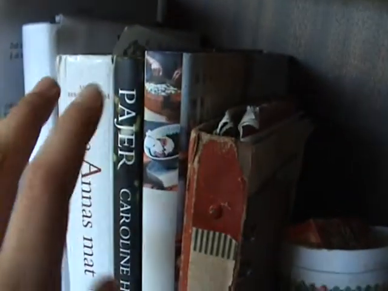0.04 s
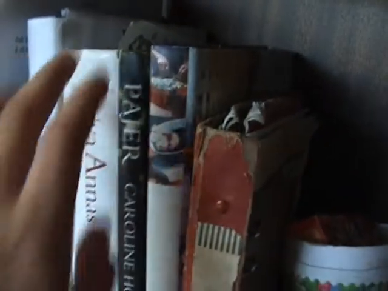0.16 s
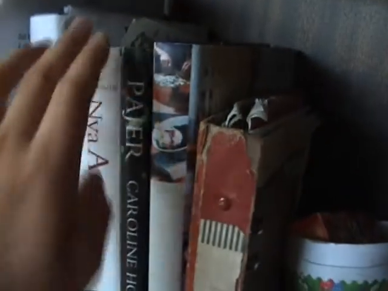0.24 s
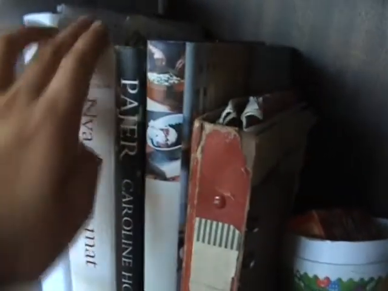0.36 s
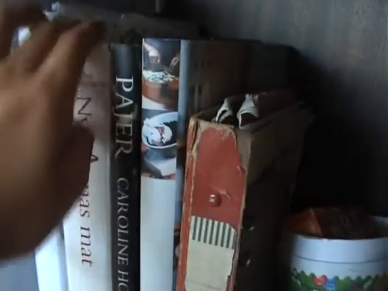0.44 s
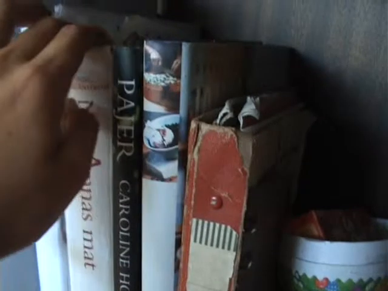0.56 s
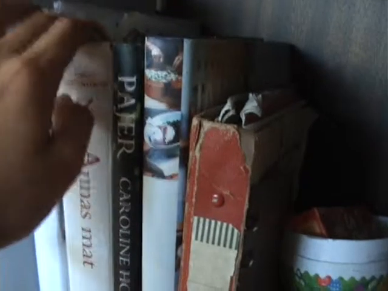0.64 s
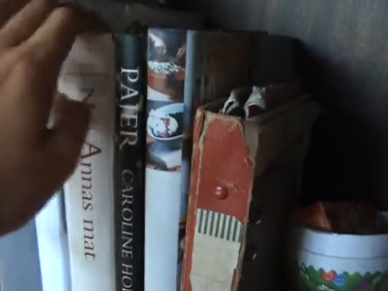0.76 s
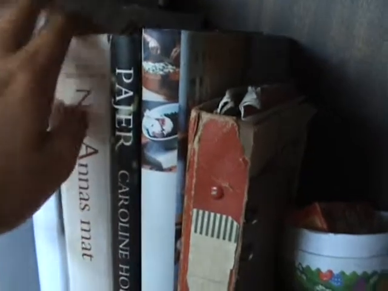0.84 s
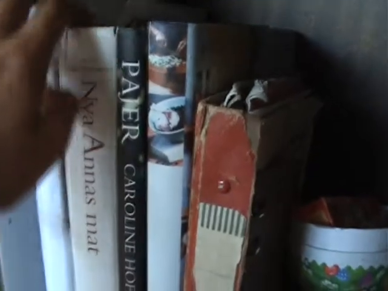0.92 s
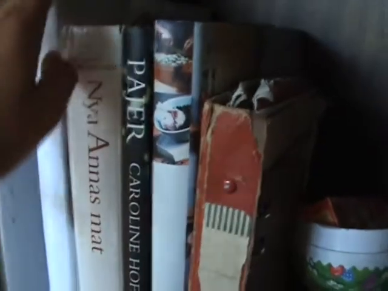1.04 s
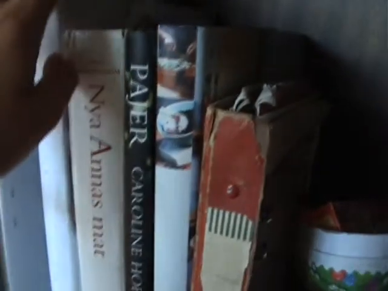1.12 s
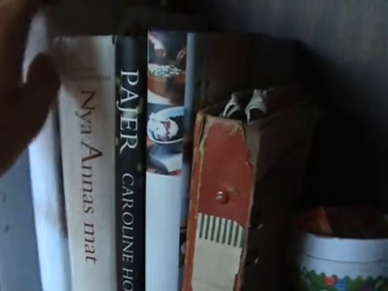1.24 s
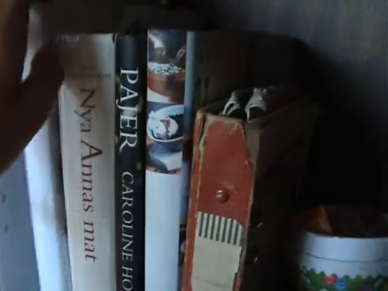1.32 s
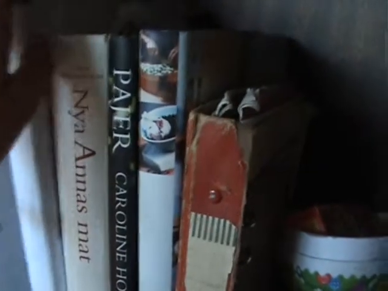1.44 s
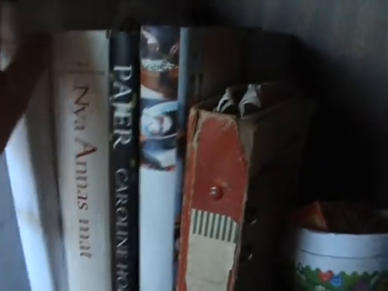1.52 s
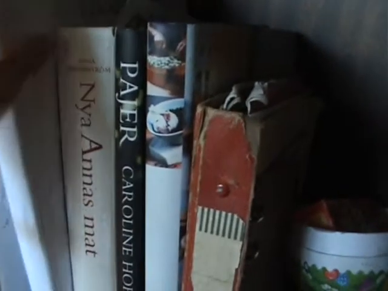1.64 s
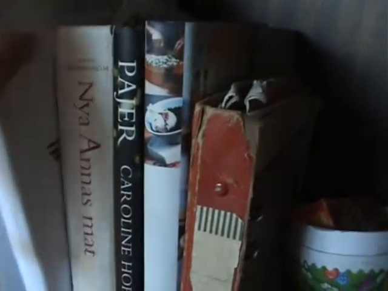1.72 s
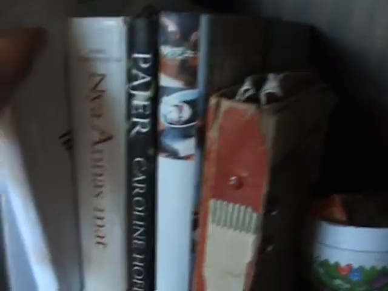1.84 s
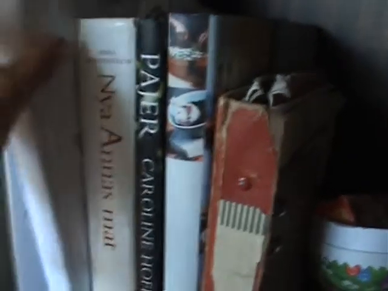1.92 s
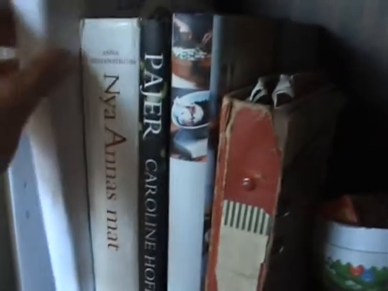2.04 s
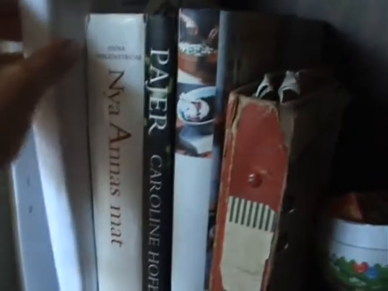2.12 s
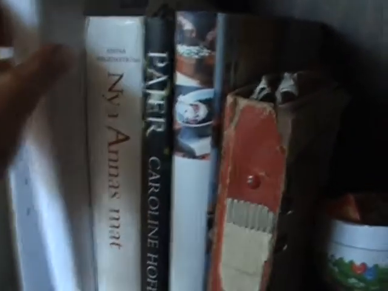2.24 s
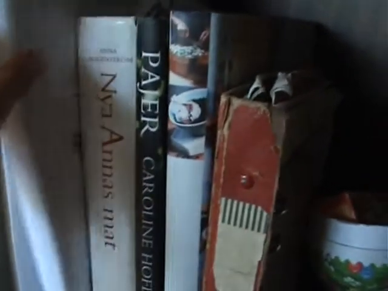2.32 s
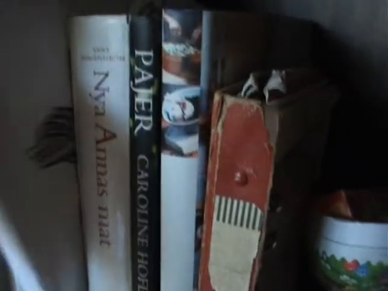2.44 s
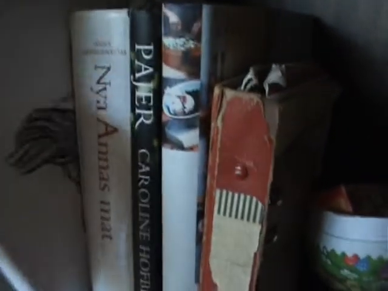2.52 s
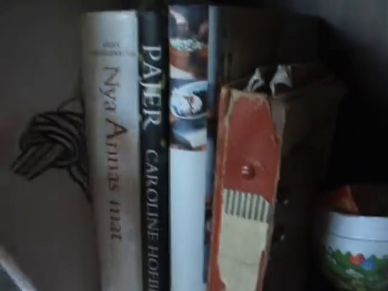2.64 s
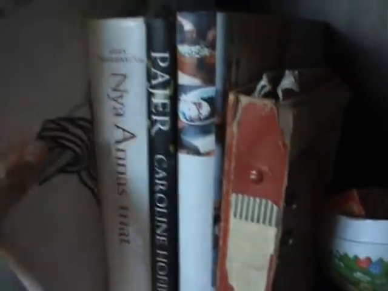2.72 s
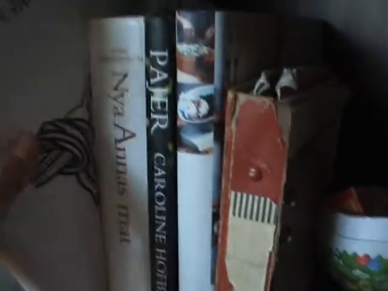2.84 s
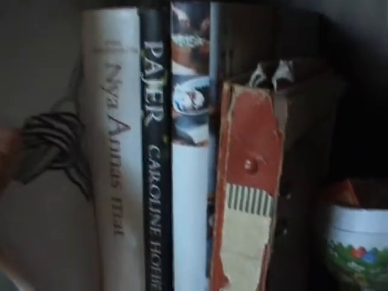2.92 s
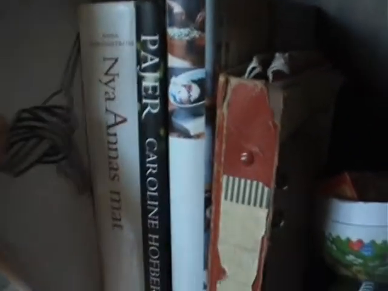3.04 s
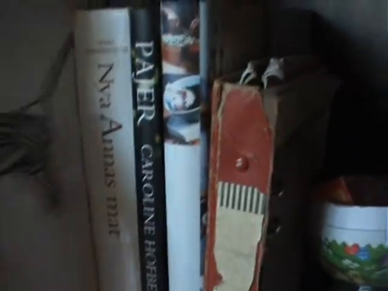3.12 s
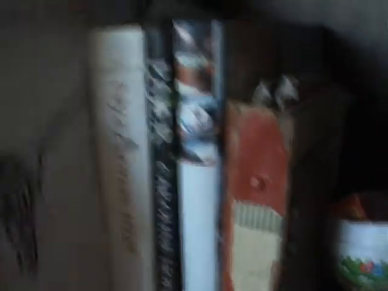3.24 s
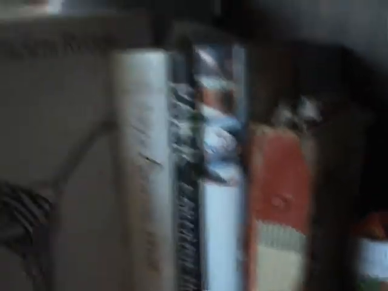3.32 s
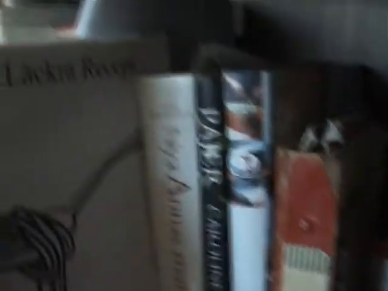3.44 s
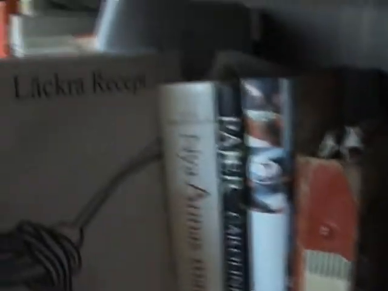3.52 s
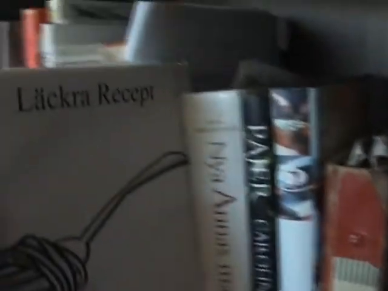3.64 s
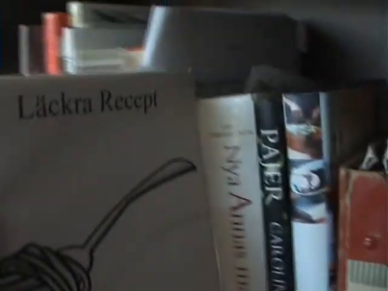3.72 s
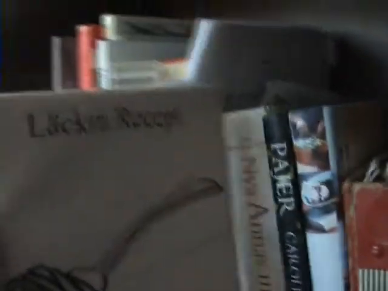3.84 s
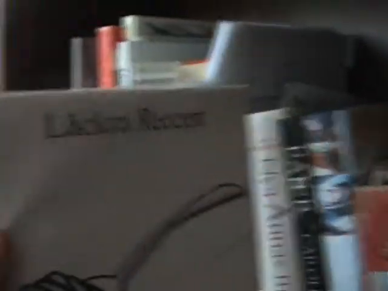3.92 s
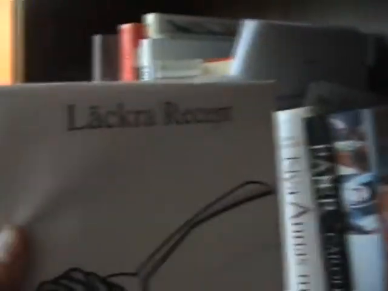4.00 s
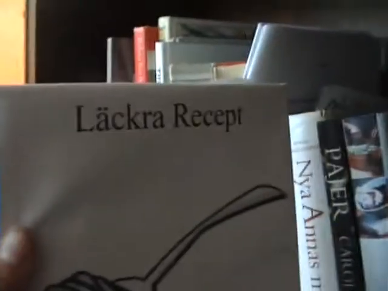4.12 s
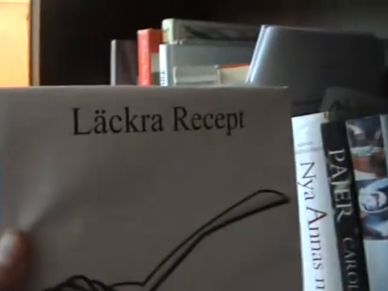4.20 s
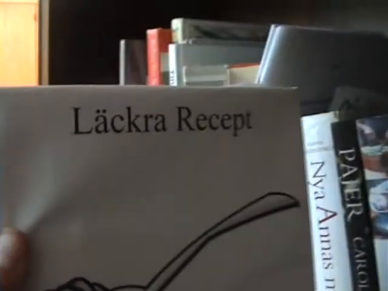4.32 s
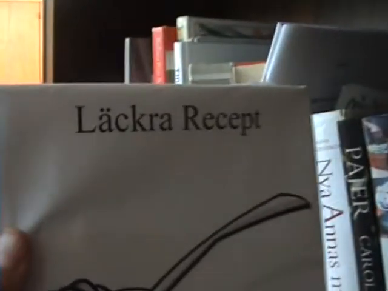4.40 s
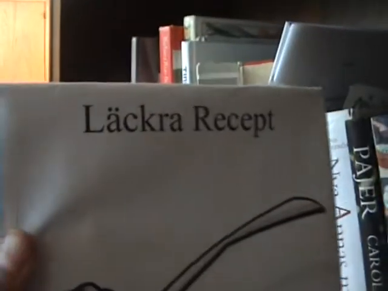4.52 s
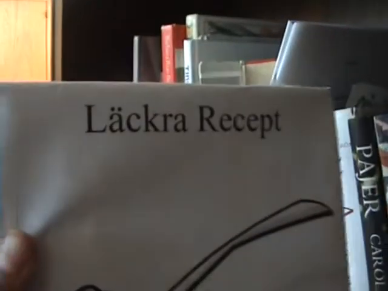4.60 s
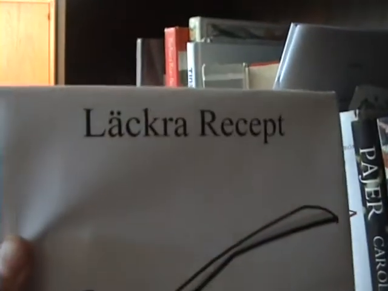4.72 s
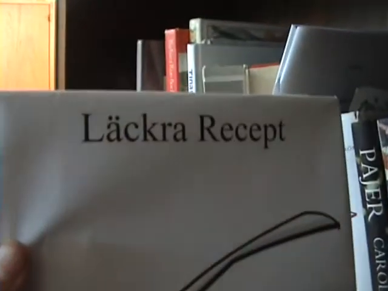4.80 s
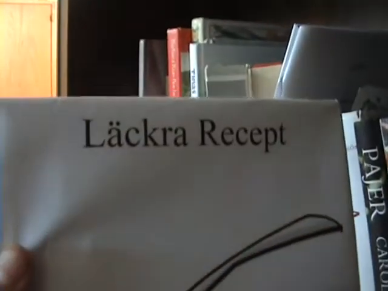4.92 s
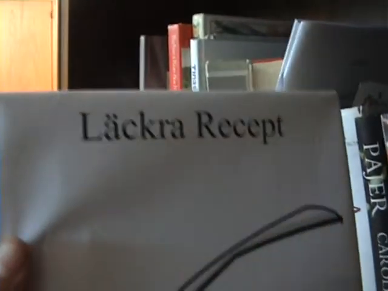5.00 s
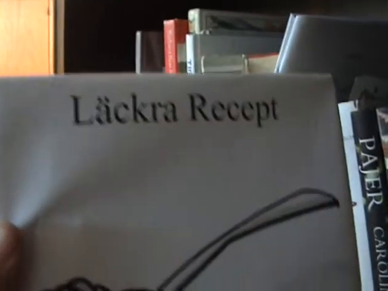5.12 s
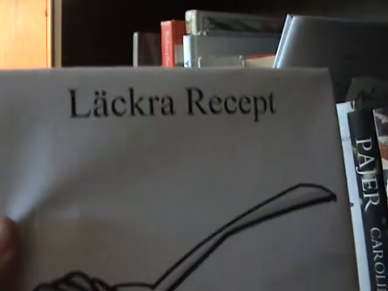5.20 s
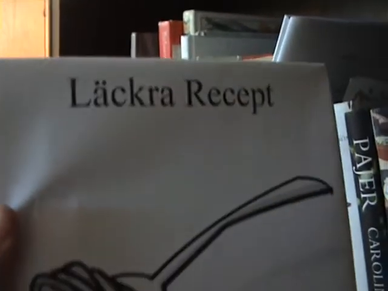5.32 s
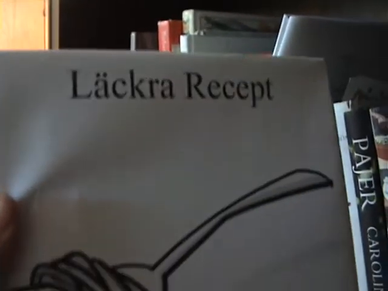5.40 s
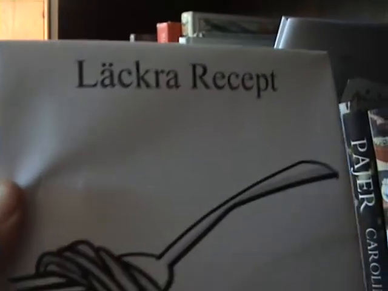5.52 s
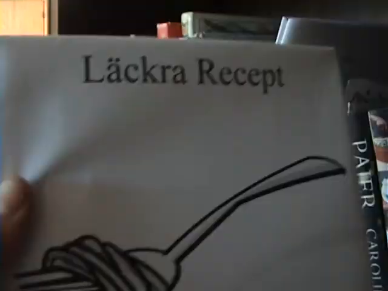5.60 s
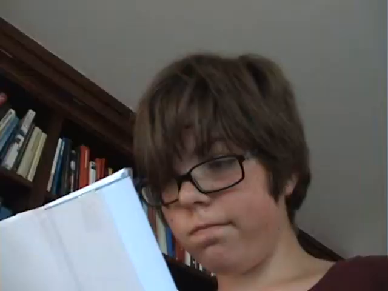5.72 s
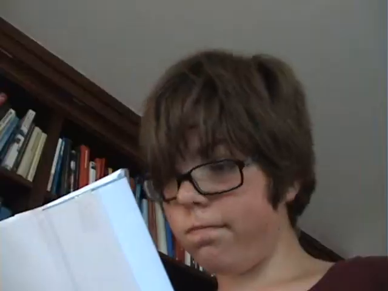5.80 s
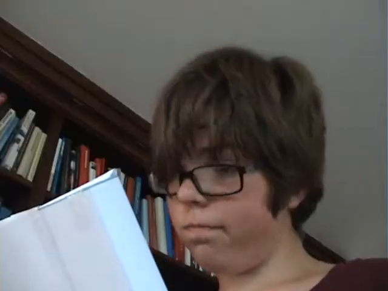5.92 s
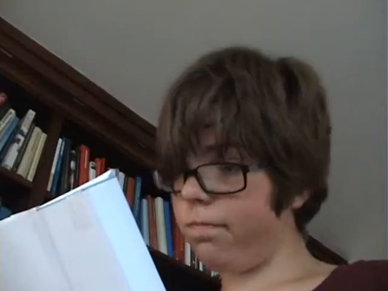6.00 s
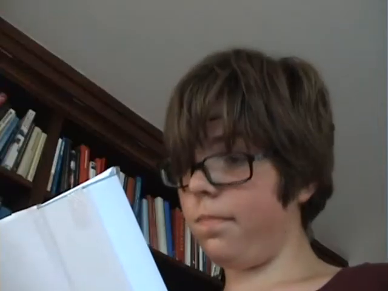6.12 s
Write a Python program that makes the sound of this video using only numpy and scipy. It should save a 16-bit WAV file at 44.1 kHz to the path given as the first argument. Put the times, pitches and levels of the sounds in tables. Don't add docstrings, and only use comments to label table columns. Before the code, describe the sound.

Covers scrape and hiss as a book is tugged free between others, bumping the wooden shelf, before near-quiet with a small motor ticking and whining.

```python
import sys
import numpy as np
from scipy import signal
from scipy.fft import rfft, irfft, next_fast_len
from scipy.io import wavfile

SR = 44100
rng = np.random.default_rng(int(sys.argv[2]) if len(sys.argv) > 2 else 0)


def ratio(d):
    e = np.asarray(d, float) / 20
    return 10 ** e


def to_wav(s):
    ch = np.atleast_2d(s).T
    pcm = np.round(np.clip(ch, -1, 1) * 32767)
    wavfile.write(sys.argv[1], SR, pcm.astype(np.int16))


N = 271656

# fastest [t/s], run-up [s], run-out [s], rasp [level/dB], brightness [dB]
STROKES = [(.49, 0.0041, .005, -54.5, 5), (.55, 0.037, 0.046, -56.5, 0.5),
           (.855, 0.004, 0.0064, -55.5, 5.5), (.95, 0.014, .005, -58, 4.5),
           (0.991, 0.024, 0.054, -49, -2.5), (1.13, 0.018, 0.008, -47, 0.5), (1.09, .015, 0.018, -53.5, -1),
           (1.18, 0.0087, 0.0062, -54.5, 3.5), (1.44, 0.052, .02, -55.5, -1), (1.5, 0.041, 0.15, -44, 1),
           (1.72, 0.058, 0.024, -43, 2.5), (1.82, 0.058, 0.062, -41.5, -0.5),
           (2.152, 0.12, 0.0084, -38.5, 0.5), (2.621, 0.28, 0.081, -36.5, 2.5),
           (2.78, 0.052, 0.089, -61, 8.5), (2.868, 0.01, 0.0029, -44.5, -1),
           (3.0, 0.046, 0.063, -45.5, 2.5), (3.11, 0.014, 0.059, -53, -1), (3.225, 0.032, 0.042, -34.5, 2),
           (3.372, 0.088, 0.067, -32, 3), (3.5, 0.039, 0.1, -42, 3.5), (3.601, 0.016, 0.043, -44.5, 9),
           (3.685, 0.024, 0.026, -37, 5.5), (3.81, 0.079, 0.052, -37, 7), (3.87, 0.04, 0.012, -48.5, 17.5),
           (3.95, 0.039, .02, -52, 0), (4.005, 0.0036, 0.013, -39.5, 9.5), (4.07, 0.024, 0.016, -54.5, -4)]
# middle [t/s], half length [s], rasp [level/dB], brightness [dB]
FIDGET = (2, 1.74, -68, 1)
# [f/Hz], [level/dB per Hz]
RUB_SPECTRUM = [(29, -44), (70, -15), (150, -1), (300, -2), (450, -4), (700, -10), (1020, -6), (2300, -8),
                (3000, -1), (3800, -3), (5000, -2), (8000, -4), (12300, -8), (16000, -18)]


def unit(x):
    return x / np.sqrt(np.mean(x ** 2) + 1e-20)


def along(points, hz):
    f, v = np.transpose(points)
    return np.interp(np.log(hz + 1), np.log(f + 1), v)


def curves(rows):
    s, *cols = np.transpose(rows)
    return [np.interp(np.arange(N) / SR, s, c, left=-120, right=c[-1]) for c in cols]


def wobble(rate_hz):
    at = np.arange(N) * rate_hz / SR
    knot, part = np.floor(at), at % 1
    knots = rng.standard_normal(int(N * rate_hz / SR) + 2)
    return 1.15 * np.interp(knot + part * part * (3 - 2 * part), np.arange(len(knots)), knots)


def filtered(x, response):
    m = next_fast_len(N + SR // 2)
    return irfft(rfft(x, m) * response(np.fft.rfftfreq(m, 1 / SR)), m)[..., :N]


def band(f, low_hz, high_hz):
    steady_top_hz = 15850
    return (f < steady_top_hz) / np.sqrt((1 + (low_hz / (f + 1)) ** 8) * (1 + (f / high_hz) ** 8))


def ring(f, hz, width_hz):
    return 1j * f * width_hz / (hz * hz - f * f + 1j * f * width_hz)


def scrape():
    # [t/s], [level/dB]
    freed = [
        (.4, 2),
        (1.1, 0.5),
        (1.5, -2),
        (2.15, -1),
        (2.5, -0.5),
        (2.9, -0.5),
        (3.4, -4),
        (3.75, 3.5),
        (4.05, 7),
    ]
    # [t/s], rumble [level/dB]
    weight = [(.43, -66), (.49, -49.5), (.68, -57), (.85, -52), (1.18, -56.5), (1.23, -54), (1.5, -47.5),
              (1.6, -54), (2.02, -58.5), (2.15, -49), (2.27, -55.5), (2.36, -40.5), (2.5, -51),
              (3.38, -50.5), (3.46, -38.5), (3.56, -56), (3.95, -41), (4.05, -35.5)]
    # [t/s], [level/dB]
    edge = [
        (3.93, -68),
        (3.96, -38),
        (4.0, -37),
        (4.03, -33),
        (4.06, -37.5),
        (4.12, -62),
    ]
    # [f/Hz], width [Hz], [level/dB]
    lip_modes = [(686, 47, 0), (1230, 120, 1.5), (1930, 260, -5.5)]
    hiss_grows, cover_grows = 1.48, 0.82

    t, shape_db = speeds()
    rows = list(STROKES) + [FIDGET]
    top_db, bright_db = np.transpose([row[-2:] for row in rows])[:, :, None]

    def summed(db):
        return np.interp(np.arange(N) / SR, t, np.sqrt(np.sum(ratio(db) ** 2, axis=0)))

    speed = summed(top_db + shape_db)
    rasp = speed * rubbing(2400, 5500, grit_hz=2500, grit_db=2.6, catch_db=1.2)

    hiss = summed(top_db + bright_db + hiss_grows * shape_db)
    hiss = hiss * rubbing(5500, 16000, grit_hz=2500, grit_db=2.6, catch_db=1.1)

    boom = summed(-45.5 + cover_grows * (top_db + 44.5) - 0.093 * bright_db + shape_db * 0.83)
    cover = boom * ratio(curves(freed)[0] + 0.84)
    cover = cover * rubbing(530, 2480, grit_hz=596.4, grit_db=2, catch_db=1.5)

    board_db, = curves(list(weight) + [(4.2, -77), (4.3, -101)])
    board = ratio(board_db) * rubbing(40, 650, grit_hz=90, grit_db=1.5, catch_db=1.5)

    def hollow(f):
        return sum(ratio(db - along(RUB_SPECTRUM, f)) * ring(f, hz, w) for hz, w, db in lip_modes)

    lip_db, = curves(list(edge) + [(4.2, -120)])
    drag = rubbing(480, 2500, grit_hz=300, grit_db=2.5, catch_db=-2.5)
    lip = ratio(lip_db) * unit(filtered(drag, hollow))
    return rasp + speed * gap() + hiss + cover + board + lip


def speeds():
    swell_db_per_s, sag_db_per_s = 26.5, 46
    grip_db_per_s, let_go_db_per_s = 306, 348
    top, up, out = np.transpose(STROKES)[:3, :, None]
    t = np.arange(0, N + 64, 32) / SR
    early, late = top - t, t - top
    drop = swell_db_per_s * early.clip(0) + grip_db_per_s * (early - up).clip(0)
    drop = drop + sag_db_per_s * late.clip(0) + let_go_db_per_s * (late - out).clip(0)
    fidget = grip_db_per_s * (np.abs(t - FIDGET[0]) - FIDGET[1]).clip(0)
    return t, -np.vstack([drop, fidget])


def rubbing(low_hz, high_hz, grit_hz, grit_db, catch_db):
    # [f/Hz], likeness [-1..1]
    alike = [(60, 1), (250, 1), (640, 0.6), (1400, 0.91), (3100, 0.66), (6800, 0.86), (15000, 0.75)]
    pair = rng.standard_normal((2, N)) * ratio(grit_db * wobble(grit_hz) + catch_db * wobble(45))

    def colour(f):
        turn = np.arccos(np.clip(along(alike, f), -1, 1)) / 2
        return ratio(along(RUB_SPECTRUM, f)) * band(f, low_hz, high_hz) * [np.cos(turn), np.sin(turn)]

    mid, side = filtered(pair, colour)
    return unit(np.array([mid + side, mid - side]))


def gap():
    # [t/s], [f/Hz], over the rasp [level/dB]
    pitch = [(1.08, 5980, -6), (1.135, 6050, -4), (1.2, 3294, -17), (1.5, 3286, -11), (2.1, 2990, -10),
             (2.33, 2916, -1), (2.5, 3510, -5), (2.62, 4540, -8), (2.72, 4204, -3), (3.2, 3450, -24),
             (3.3, 4610, -15), (3.38, 5770, -2), (3.44, 5540, -5), (3.7, 6480, -13), (3.85, 6830, 3),
             (3.93, 4360, -5), (4.02, 4390, -2), (4.2, 4390, -10)]
    width_hz = 365
    hz, db = curves(pitch)
    slow = filtered(rng.standard_normal((2, N)), lambda f: 1 / (1 + (f / width_hz) ** 2))
    turn = 2 * np.pi * np.cumsum(hz.clip(0)) / SR
    return ratio(db) * unit(slow[0] * np.cos(turn) + slow[1] * np.sin(turn))


def snaps():
    # [f/Hz], width [Hz], [level/dB]
    jacket_modes = [(1450, 140, -4.5), (1830, 97, 2), (2700, 260, -5.5), (3240, 98, -1), (4140, 540, -5),
                    (5550, 120, -5), (6330, 600, -2.5)]
    lead_s, jacket_db, sharp_db = 0.00062, -5, -23
    out = np.zeros(N + SR)
    since = np.arange(2048) - 160
    t, f = since.clip(0) / SR, np.fft.rfftfreq(2048, 1 / SR)
    lead = np.exp(since.clip(max=0) / SR / lead_s)
    jacket = sum((-1) ** k * ratio(db) * ring(f, hz, w) for k, (hz, w, db) in enumerate(jacket_modes))
    events = contacts()
    seeds = rng.standard_normal((len(events), 2048))
    for (s, db, hz, dull_db, bright_db, t60), seed in zip(events, seeds):
        decay = ratio(-60 * t / .004) + .16 * ratio(-60 * t / t60 / 2)
        burst = rfft(seed * decay * lead + 7 * (since == 0))
        cover = ring(f, hz, 456) * ring(f, hz, 4400)
        cover = cover + ratio(jacket_db) * jacket * ring(f, 1.1 * hz, 1.33 * hz) ** 2
        cover = cover + ratio(sharp_db) * ring(f, hz, 3 * hz)
        responses = cover * ring(f, 1940, 14000) ** 2, ring(f, 580, 1160) ** 3, ring(f, 8600, 6500) ** 3
        parts = [irfft(burst * p) for p in responses]
        body, dull, bright = [p / np.abs(p).max() for p in parts]
        snap = body + ratio(dull_db) * dull + ratio(bright_db) * bright
        out[round(s * SR) - 142:][:2048] += ratio(db) * snap
    return out[:N]


def contacts():
    # [t/s], peak [level/dB], ring [f/Hz]
    cracks = [(.4595, -39, 900), (.4842, -25.5, 1680), (.86, -34, 1970), (1.0111, -28, 1670),
              (1.2381, -41, 1160), (2.1026, -31, 3150), (2.832, -42, 960), (2.8505, -21, 3600),
              (2.856, -9.5, 2600), (2.8563, -18, 6200), (2.8605, -26, 2100), (3.0214, -29.5, 4270)]
    # [t/s], peak [level/dB], ring [f/Hz]
    further_rings = [(.4845, -33, 2950), (.4848, -38, 8000), (.8335, -30, 3860), (.8338, -36, 9000),
                     (.9638, -25, 5300), (.9725, -30, 2800), (.9755, -21, 6330), (.9828, -23, 5600),
                     (1.0985, -30, 4500), (1.176, -36, 8250), (1.18, -38, 11000), (1.2601, -30, 1790),
                     (1.2603, -29, 4250), (1.2606, -30, 6000), (2.7497, -23, 1890), (2.7499, -22, 900),
                     (2.7501, -24, 6000), (2.8568, -17, 990), (2.8566, -17, 4200), (3.112, -31, 4300),
                     (3.129, -33, 4300), (3.2083, -22, 4400), (3.727, -25, 4300), (6.02, -52, 9000)]
    # [t/s], peak [level/dB], ring [f/Hz], bright part [level/dB]
    paper_ticks = [(0.558, -38, 1750, 2), (0.9607, -20.5, 1830, 1), (.9636, -17.5, 1510, 2),
                   (0.976, -15.5, 1730, 6), (0.9814, -16, 1830, -3), (0.9824, -11, 2700, -6),
                   (3.208, -15.5, 3000, -9), (1.098, -27.5, 5800, 8), (1.2603, -26.5, 2800, -3),
                   (1.8868, -29.5, 1140, -8), (2.0072, -24, 3330, 10), (2.422, -25.5, 3300, 1),
                   (3.8322, -26.5, 6900, 12), (3.904, -34, 1900, 16)]
    # [t/s], peak [level/dB], ring [f/Hz], dull part [level/dB]
    page_knocks = [(.5816, -38, 1610, 4.5), (.6744, -47, 1580, 2), (.833, -22, 2000, -12),
                   (1.0394, -35, 1810, -13), (1.1812, -38, 1760, 0.5), (1.186, -38, 1780, -10),
                   (1.7142, -23, 1550, -6.5), (2.1288, -25, 1720, -14), (2.137, -25.5, 2600, 3),
                   (2.1435, -25, 1900, -12), (2.155, -28, 2300, -12), (2.1625, -23, 2660, -6),
                   (2.1627, -25, 1500, -10), (2.2528, -27, 980, -3), (2.2535, -30, 2750, -20),
                   (2.3371, -36, 1500, -1), (2.7495, -12, 3520, -16), (2.758, -24, 980, -6),
                   (2.9592, -33, 900, 0), (3.015, -33, 950, -3), (3.053, -33, 900, 0),
                   (3.1087, -34.5, 950, 2), (3.1283, -33, 1020, -11), (3.191, -26, 800, 0),
                   (3.468, -17, 900, -3), (3.4685, -24, 1500, -20), (3.8243, -17, 900, -6),
                   (3.8245, -18, 1700, -20), (3.8247, -19, 2600, -20), (3.863, -22, 960, -8),
                   (3.9394, -35, 1280, -4), (3.9454, -35, 1210, 2), (4.0444, -27, 1300, -3),
                   (4.0816, -30, 2040, -2), (4.083, -36, 4800, -20), (3.9745, -32, 3500, -10),
                   (3.9115, -32, 2500, -10), (4.1194, -39, 1210, -5), (4.4064, -42, 1900, 2),
                   (4.41, -45, 1000, 0), (4.605, -47, 2000, -3), (5.3772, -45, 1260, -2),
                   (5.378, -46, 2600, -20), (5.4944, -40, 1900, -6), (5.497, -44, 3000, -20),
                   (5.81, -48, 900, 0), (6.018, -43, 2200, -6)]

    def dry_snaps(rows):
        return [(s, db, hz, -30, -50, .011) for s, db, hz in rows]

    ticks = [(s, db, hz, -23, bright_db, 0.02) for s, db, hz, bright_db in paper_ticks]
    knocks = [(s, db, hz, dull_db, -28, 0.025) for s, db, hz, dull_db in page_knocks]
    return sorted(dry_snaps(cracks) + ticks + knocks) + dry_snaps(further_rings)


def bumps():
    # [t/s], peak [level/dB], main [f/Hz], ringing [cycles]
    hits = [(0.457, -40, 450, 15), (.602, -38, 330, 6), (.88, -45, 70, 4), (0.823, -39, 206, 8.3),
            (1.029, -34, 211, 6.7), (1.144, -27.5, 233, 5.5), (1.157, -31, 335, 6.3), (1.179, -31, 300, 5),
            (1.31, -34, 190, 2.8), (1.323, -43, 110, 5), (1.359, -37.5, 127, 6.5), (1.395, -34.5, 332, 5.6),
            (1.407, -39, 140, 5), (1.426, -31, 213, 5.5), (1.465, -33, 220, 4), (1.488, -34.5, 216, 9.8),
            (1.512, -34, 380, 8), (1.54, -31.5, 380, 6.5), (1.558, -37, 130, 4.2), (1.565, -32, 450, 5),
            (1.713, -30, 224, 11.3), (1.887, -41, 445, 12), (2.134, -32, 400, 3.1), (2.0, -38, 202, 5),
            (2.146, -22, 190, 4.2), (2.154, -30, 226, 3.6), (2.229, -38, 300, 4.5), (2.2522, -25, 420, 3),
            (2.6, -39, 170, 5.5), (2.835, -31.5, 181, 3.9), (2.863, -26.5, 208, 5.5), (2.952, -39, 280, 9),
            (3.051, -30.5, 395, 10.2), (3.159, -32.5, 143, 6.5), (3.284, -26, 450, 8.4),
            (3.309, -28, 274, 5.7), (3.419, -12, 493, 6.5), (3.423, -22.5, 280, 5.4),
            (3.428, -17.5, 128, 6.9), (3.466, -24.5, 99, 6.8), (3.502, -41, 93, 17),
            (3.8235, -15.5, 550, 8.1), (3.862, -32.5, 235, 8.6), (3.912, -23.5, 272, 9.3),
            (3.9092, -18.5, 514, 8.7), (3.943, -32, 170, 8), (3.953, -29.5, 200, 8),
            (4.0325, -19.5, 280, 4), (4.402, -44, 300, 4), (5.493, -50, 400, 3)]
    # multiple of the main [1], [level/dB]
    board_modes = [(1.002, 3), (1.7, -3.5), (2.6, -2.5)]
    out, t = np.zeros(N + SR), np.arange(SR // 4) / SR
    lucks = rng.standard_normal((len(hits), len(board_modes)))
    for (s, db, hz, cycles), luck in zip(hits, lucks):
        modes = 0
        for (k, level_db), z in zip(board_modes, luck):
            decay = ratio(level_db + z - 60 * t * hz * k / cycles)
            modes = modes + decay * np.sin(2 * np.pi * hz * k * t)
        out[round(s * SR):][:len(t)] += ratio(db + 2.0) * modes * (1 - np.exp(-t / 0.0016))
    return filtered(out[:N], lambda f: ring(f, 310, 4200))


def room(x):
    # [f/Hz], t60 [s]
    walls = [(200, 0.098), (2000, 0.012), (10000, 0.017)]
    hz, t, z = signal.stft(rng.standard_normal((2, SR // 3)), SR, nperseg=256)
    z[1] *= (hz / (hz + 900))[:, None]
    mid, side = signal.istft(z * ratio(-60 * t / along(walls, hz)[:, None]), SR, nperseg=256)[1]
    tail = np.array([mid + side, mid - side]) / np.linalg.norm(mid)
    return signal.fftconvolve(np.pad(x, (120, 0))[None], tail, axes=1)[:, :N]


def motor():
    # [f/Hz], width [Hz], [level/dB]
    case_modes = [(2050, 150, -5), (2800, 220, 1), (3250, 250, -2), (3620, 150, -6)]
    # [t/s], [level/dB]
    tick_level = [
        (0, -67),
        (4.5, -67),
        (4.8, -65.5),
        (5.2, -66.5),
        (5.6, -64.5),
        (5.82, -64.5),
        (5.88, -71),
        (6.16, -71),
    ]
    # middle [t/s], half length [s], [f/Hz], rms [level/dB]
    whine_lines = [(0.153, 0.26, 4200, -73), (.15, .2, 5100, -73), (.3, .15, 4500, -80),
                   (.25, 0.22, 10200, -77), (1.2, .5, 4500, -80), (2.2, .5, 4200, -80),
                   (4.45, 0.33, 4500, -71), (4.55, .12, 5420, -74), (4.4, .2, 5200, -74),
                   (4.95, .25, 3900, -76), (5.9, .12, 900, -72), (6.05, .12, 960, -73),
                   (4.5, 0.56, 5100, -74), (4.64, 0.14, 5530, -71), (4.5, .25, 5300, -72),
                   (4.95, 0.33, 4200, -70), (4.9, .3, 4800, -75), (4.8, .1, 3900, -82),
                   (4.8, .5, 6380, -76), (5.9, .3, 5100, -76), (6.05, .1, 2200, -72)]
    step_hz, burst_hz = 300, 25
    t = np.arange(N) / SR
    since = (t + .003) * burst_hz % 1 / burst_hz
    beat = np.diff(np.floor(np.arange(N + 1) / SR * step_hz))
    steps = beat * (1 + .2 * rng.standard_normal(N)) * ratio(-60 * since / .09)

    def case(f):
        return sum((-1) ** k * ratio(db) * ring(f, hz, w) for k, (hz, w, db) in enumerate(case_modes))

    ticks = unit(filtered(steps, case))
    buzz = ratio(-74) * unit(filtered(beat, lambda f: ring(f, 7000, 9000) * band(f, 3800, 16000)))
    drift, flutter_db = .8 * wobble(30), .8 * wobble(18)
    whine = 0
    for s, half_s, hz, db in whine_lines:
        fade_db = 6 * np.minimum((t - s) / half_s, 3) ** 4
        whine = whine + ratio(db + 2 - fade_db) * np.sin(2 * np.pi * hz * t + drift * hz / 4000)
    left_right = [[1.8], [.2]]
    return ratio(curves(tick_level)[0]) * ticks * left_right + buzz + ratio(flutter_db) * whine


def hum():
    # [f/Hz], rms [level/dB]
    hum_lines = [(98, -73), (200, -72), (300, -71.5), (600, -79.5), (900, -86), (15622, -81)]
    t = np.arange(N) / SR
    return sum(ratio(db + 6.5 + 2 * wobble(8.1)) * np.sin(2 * np.pi * hz * t + 1.37 * wobble(9))
               for hz, db in hum_lines)


def hush():
    # [t/s], [level/dB]
    air = [
        (0, -57),
        (.5, -56),
        (4.2, -56),
        (4.6, -55),
        (4.7, -55.5),
        (4.85, -57.5),
        (6.16, -56.5),
    ]
    # [f/Hz], [level/dB per Hz]
    mid_spectrum = [(13, -35), (22, -11), (40, -3), (60, -1), (85, -4), (150, -2), (260, -5), (550, -8),
                    (780, -10), (1500, -14), (3000, -16), (4500, -17.5), (6500, -16), (15800, -32)]
    # [f/Hz], [level/dB per Hz]
    side_spectrum = [(13, -42), (22, -20), (189, -7), (420, -6), (602, -7.5), (1170, -6.5), (1760, -13),
                     (2670, -15.5), (3710, -19), (6620, -23.5), (16000, -40.5)]
    # [f/Hz], width [Hz], gain [1]
    hollows = [(350, 31, 0.19), (930, 130, 1.1), (1250, 70, 1.8), (2050, 110, 0.5)]
    preamp_db = -6.5
    air_db, = curves(air)
    pair = rng.standard_normal((2, N)) * ratio(.7 * wobble(6))

    def colour(f):
        hollow = 1 + sum(gain * np.abs(ring(f, hz, w)) ** 2 for hz, w, gain in hollows)
        return np.array([ratio(along(mid_spectrum, f)) * hollow, ratio(along(side_spectrum, f))])

    low = filtered(pair, lambda f: colour(f) * band(f, 15, 2430))
    high = filtered(pair, lambda f: colour(f) * band(f, 3300, 20000))
    mid, side = ratio(air_db) * low / low[0].std() + ratio(air_db + preamp_db) * high / high[0].std()
    return np.array([mid + 1.74 * side, mid - 1.81 * side])


def scene():
    # [f/Hz], left-right [dB]
    lean = [(60, .3), (200, .6), (700, 2), (1300, 2.5), (2400, 4), (4400, 2.5), (8000, -.3), (15000, -.5)]
    # [t/s], left-right [dB]
    sideways = [
        (.4, -0.5),
        (2.9, 1),
        (3.3, 1),
        (3.6, -0.8),
        (4.2, -2),
    ]
    hits, rub = snaps() + bumps(), scrape()
    answer = room(ratio(-10.0) * hits + ratio(-33.0) * rub.mean(0))
    book = filtered(rub + hits + answer, lambda f: ratio([along(lean, f) / 2, -along(lean, f) / 2]))
    s, across_db = np.transpose(sideways)
    book = book * ratio(np.interp(np.arange(N) / SR, s, across_db) * [[.5], [-.5]])
    return book + hush() * ratio([[.7], [-.7]]) + motor() + hum()


def low_pass(x):
    return signal.sosfilt(signal.butter(12, 16810, fs=SR, output="sos"), x)


def record(dry):
    top_hz = 16600
    return low_pass(filtered(dry, lambda f: f < top_hz))


dry = scene()
out = record(dry)
to_wav(out)
```